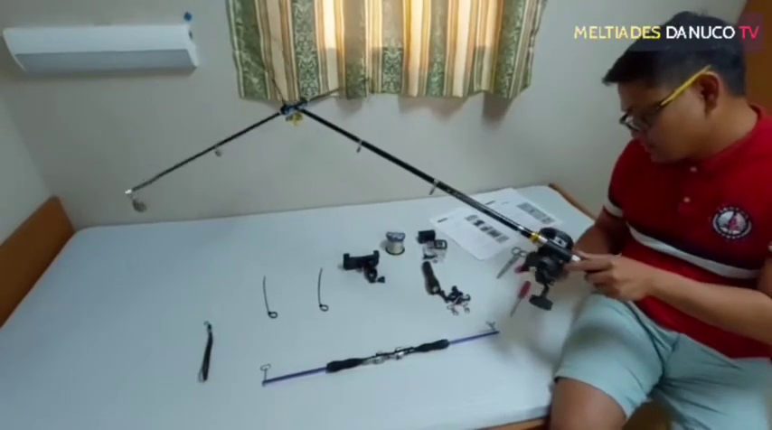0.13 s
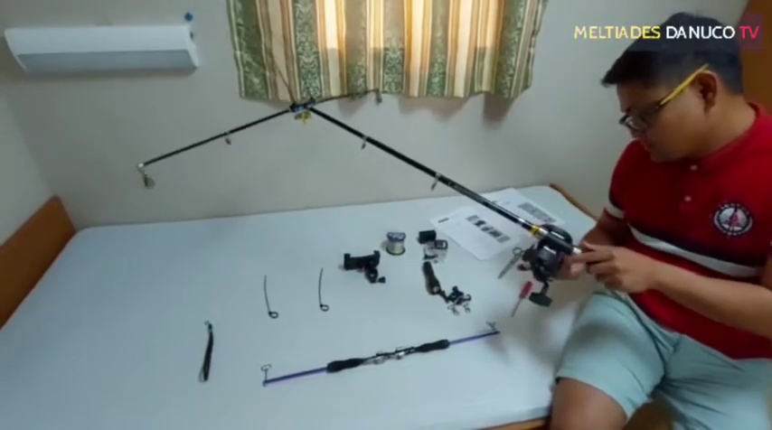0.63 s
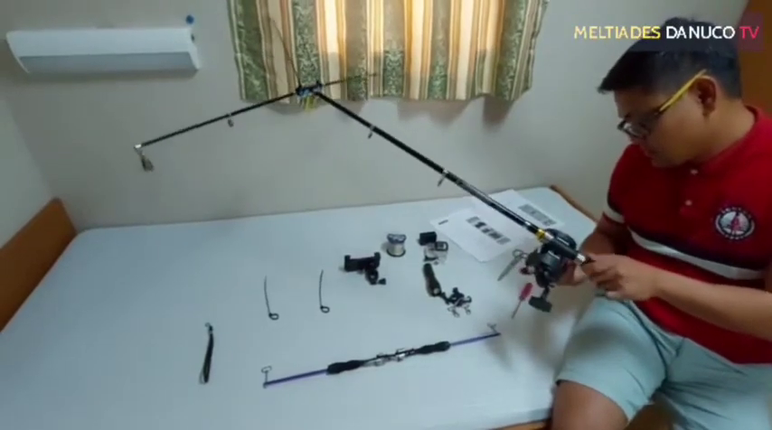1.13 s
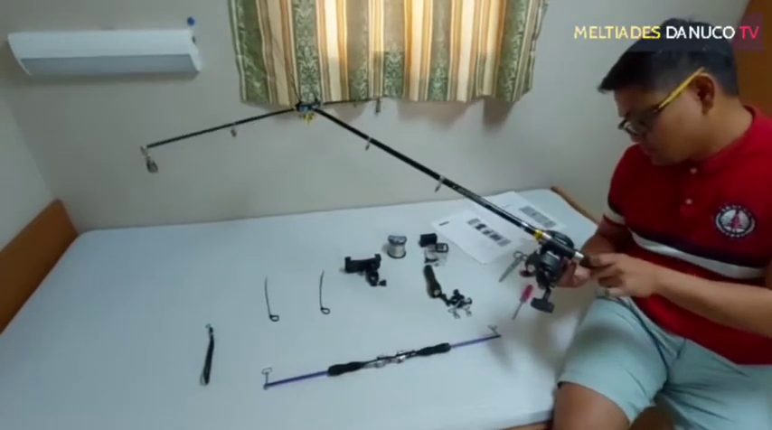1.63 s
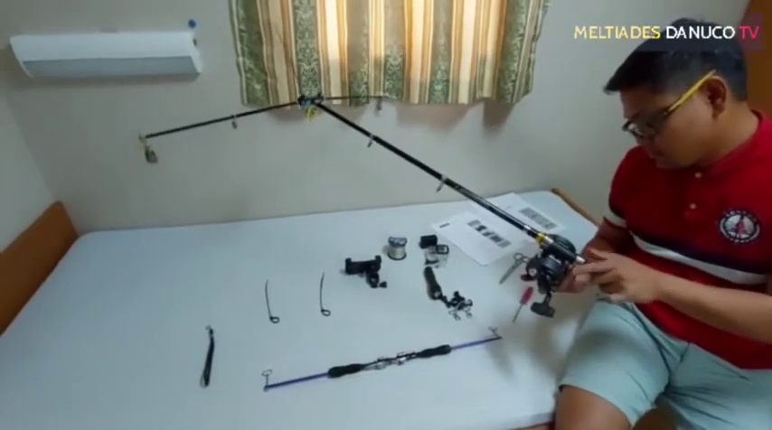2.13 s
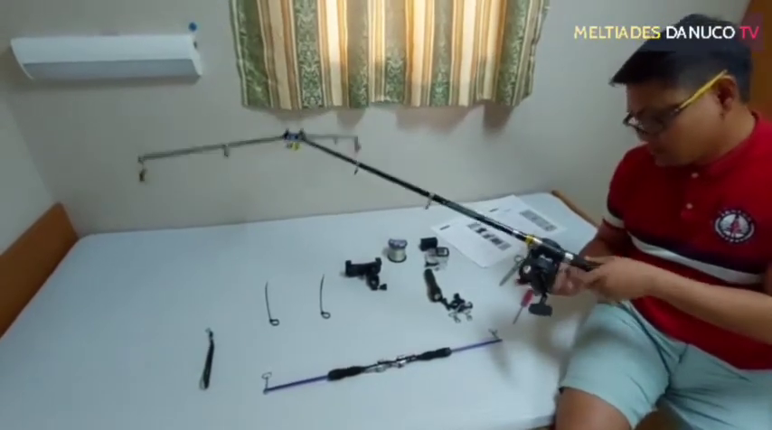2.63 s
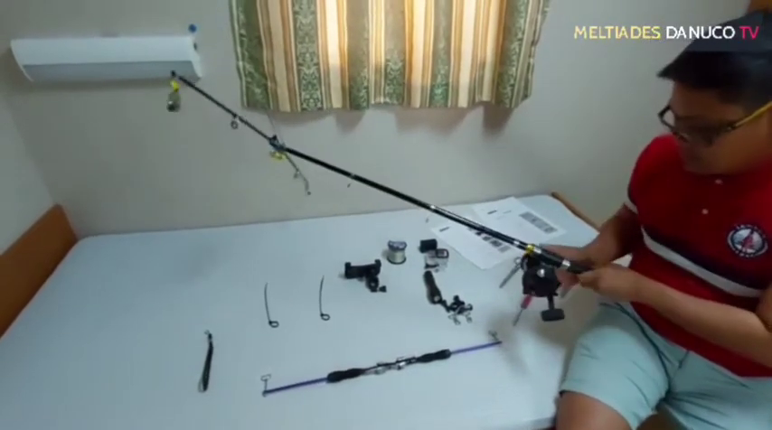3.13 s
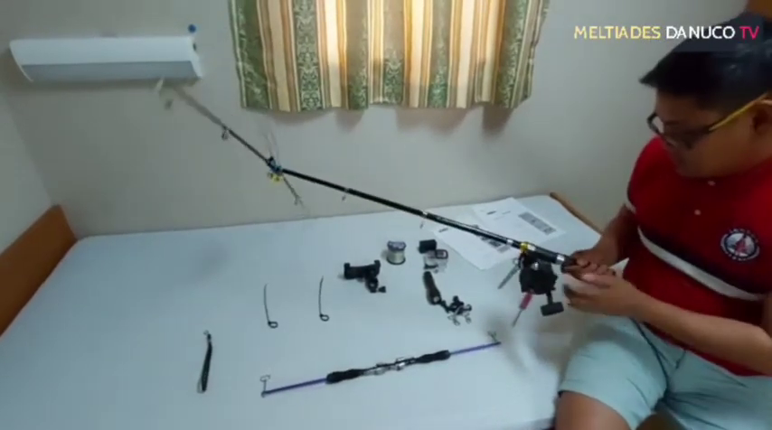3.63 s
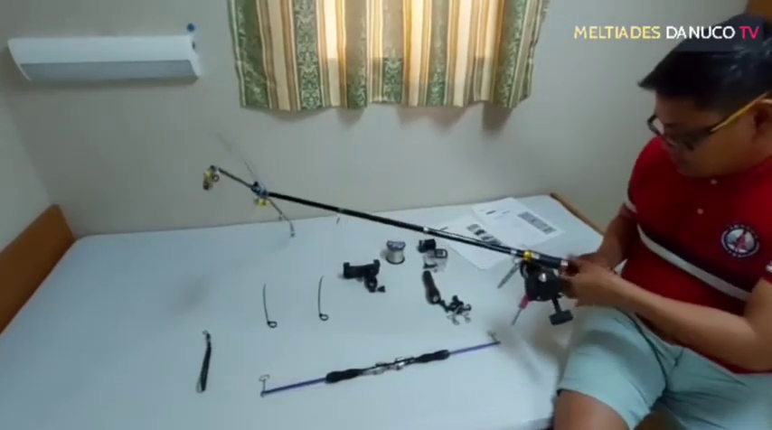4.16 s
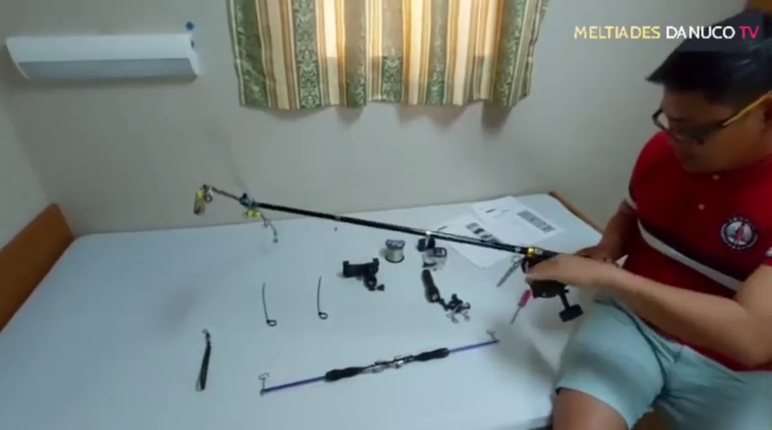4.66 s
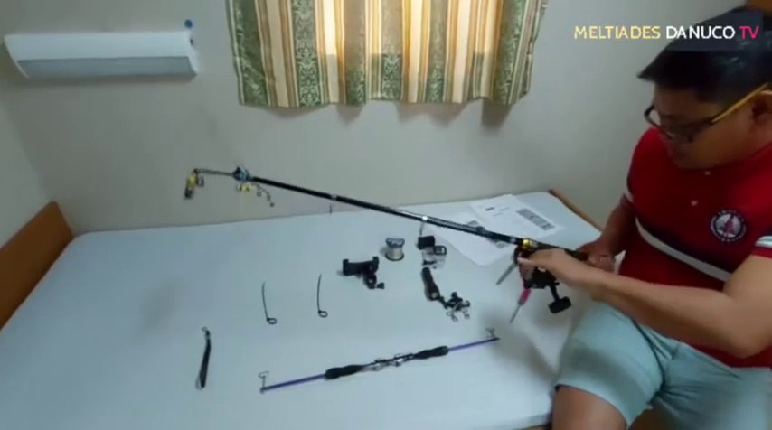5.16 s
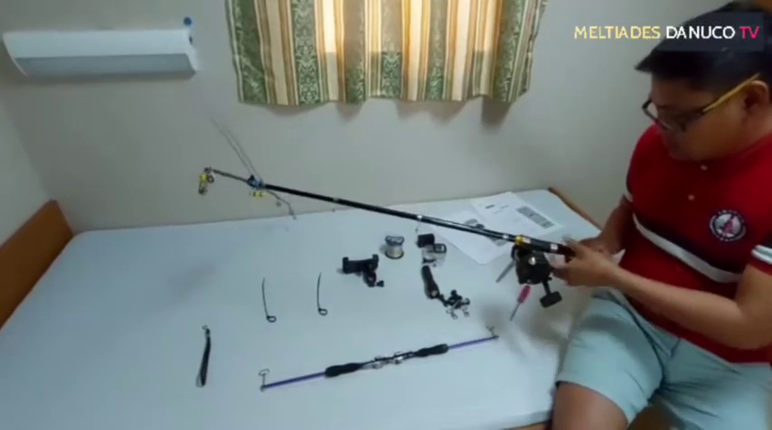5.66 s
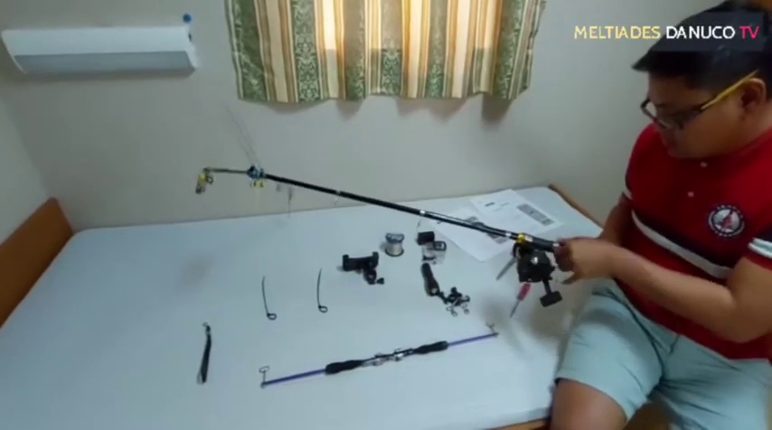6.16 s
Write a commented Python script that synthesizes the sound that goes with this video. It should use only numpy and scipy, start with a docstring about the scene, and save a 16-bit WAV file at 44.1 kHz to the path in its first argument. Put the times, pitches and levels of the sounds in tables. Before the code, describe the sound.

In a small hard-walled cabin, a deep, swelling engine rumble and throbbing drone run throughout beneath soft ventilation hiss and thin, wavering whines. Close by, a fishing rod and reel are handled: sparse plastic clicks, dull handle knocks and very high metal tinkles, busiest between one and a half and three seconds. A loud bail snap rings just before four seconds, then only scattered clicks follow. Close stereo microphones, dull at the very top.

```python
"""A fishing rod and reel are handled close by: plastic clicks and knocks, one loud snap of the bail, and small
metal tackle that tinkles near 11 kHz. Each hit is shaped noise, drawn out by the echoes of hard walls.
The small cabin around is filled by distant machinery, a swelling hull rumble with a wavering hum and a throbbing
drone, and by ventilation hiss with narrow whines. All are coloured noise but the hum, a sine.
Two microphones a few centimetres apart hear it."""
import sys
import numpy as np
from scipy import signal
from scipy.fft import rfft, irfft, next_fast_len
from scipy.io import wavfile
from scipy.ndimage import uniform_filter1d

SR = 44100
rng = np.random.default_rng(int(sys.argv[2]) if len(sys.argv) > 2 else 0)


def invert_db(level):
    """Linear amplitude ratio for a level in decibels (20 dB per decade), elementwise."""
    return 10 ** (np.asarray(level, dtype=float) / 20)


def int16_out(signal):
    """Quantize to a 16-bit WAV file."""
    q = np.round(np.clip(np.atleast_2d(signal).T, -1, 1) * 32767)
    wavfile.write(sys.argv[1], SR, q.astype(np.int16))


N = 277213
SIZE = next_fast_len(N)
HZ = np.arange(SIZE // 2 + 1) * SR / SIZE
TIME = np.arange(N) / SR


def unit(x):
    """Scale to rms 1."""
    return x / np.sqrt(np.mean(x ** 2))


def slope(points):
    """Gain per frequency, drawn through (Hz, dB) points on a logarithmic frequency axis."""
    hz, db = np.transpose(points)
    return invert_db(np.interp(np.log(HZ + 1), np.log(hz), db))


def bumps(modes):
    """Gain per frequency of steep resonances (Hz, width Hz, dB), each with its own total level."""
    power = 0
    for hz, width, db in modes:
        offset = (HZ - hz) / (width / 2)
        power = power + invert_db(db) ** 2 / width / (1 + offset ** 2) ** 2
    return np.sqrt(power)


def cabin_noise(gain, closer=0.):
    """Coloured noise at two microphones: a common part, late on the left, plus diffuse parts; rms 1."""
    lag_s = 11 / SR
    # How alike the microphones hear the cabin. Each row: frequency in Hz, share of the power common to both.
    alike = [(60, 0.98), (130, 0.95), (270, 0.89), (570, 0.78), (1000, 0.52), (4000, 0.046), (7000, 0.38),
             (11000, 0.29)]
    hz, share = np.transpose(alike)
    share = np.clip(np.interp(np.log(HZ + 1), np.log(hz), share) + closer, 0, 1)
    common, left, right = rng.standard_normal((3, len(HZ))) + 1j * rng.standard_normal((3, len(HZ)))
    together = np.array([common * np.exp(-2j * np.pi * HZ * lag_s), common])
    apart = np.array([left, right])
    pair = np.sqrt(share) * together + np.sqrt(1 - share) * apart
    return unit(irfft(pair * gain, SIZE)[:, :N])


def walk(rate):
    """Random levels held 1 / rate s and slewed twice; rms 1."""
    hold = int(SR / rate)
    steps = np.repeat(rng.standard_normal(N // hold + 1), hold)
    return unit(uniform_filter1d(uniform_filter1d(steps, hold), hold)[:N])


def evened(x, hold_s, share):
    """Machine noise is steadier than free noise: part of its own slow wander is divided out."""
    power = uniform_filter1d(np.mean(x ** 2, axis=0), int(hold_s * SR)) + 1e-9
    return unit(x * power ** (-share / 2))


def hull_rumble():
    """Deep rumble with a wavering hum, and an upper panel resonance, each swelling on its own."""
    # Swell of the hull; both levels dip briefly as the bail snaps.
    # Each row: start in seconds, deep rumble level in dB, upper rumble level in dB.
    swell = [(0.0, -28, -34.5), (0.5, -27.5, -32.5), (0.9, -27, -35.5), (1.45, -25.5, -33.5),
             (1.9, -27, -32.5), (2.25, -31, -36), (2.7, -27, -35.5), (3.1, -28, -34), (3.55, -26, -31),
             (3.84, -25.5, -36), (3.88, -37, -45), (3.93, -26.5, -30.5), (4.4, -24.5, -30),
             (4.9, -28.5, -30), (5.35, -24.5, -32), (5.75, -28, -35), (6.13, -27, -33), (6.29, -36, -43)]
    # Colour of the deep rumble. Each row: frequency in Hz, relative density in dB per Hz.
    rumble_colour = [(12, -39), (28, -9.5), (54, -2.5), (70, 1), (100, -4.5), (130, -66), (220, -120)]
    # Resonances of the upper rumble. Each row: frequency in Hz, width in Hz, relative level in dB.
    upper_modes = [(114, 22.5, 0), (136.3, 22, -6), (178.4, 19.4, -13.5)]
    s, *columns = np.transpose(swell)
    deep_db, upper_db = (np.interp(TIME, s, column) for column in columns)
    hum_hz = 59.2 * (1 + 0.01885 * walk(3.6))
    hum = np.sqrt(2) * np.sin(2 * np.pi * np.cumsum(hum_hz) / SR)
    hum_db = -5.5  # against the deep noise
    deep = evened(cabin_noise(slope(rumble_colour)) + invert_db(hum_db) * hum, 0.3, 0.49)
    upper = evened(cabin_noise(bumps(upper_modes)), 0.3, 0.82)
    return invert_db(deep_db + 1.3 * walk(9)) * deep + invert_db(upper_db + 1.54 * walk(9)) * upper


def panel_drone():
    """A panel resonance: narrow-band noise that throbs a few times a second."""
    # Resonances of the panel. Each row: frequency in Hz, width in Hz, relative level in dB.
    drone_modes = [(239.7, 19.6, 0.5), (257.6, 47, 0)]
    # Throb of the drone. Each row: time in seconds, level in dB.
    throb = [(0.07, -50), (0.33, -37), (0.56, -56.5), (0.72, -38.5), (0.99, -37), (1.12, -50), (1.42, -37),
             (1.8, -47), (1.97, -34), (2.15, -57), (2.42, -32.5), (2.51, -53.5), (2.61, -35), (2.9, -49),
             (3.25, -45.5), (3.39, -34.5), (3.53, -49.5), (3.86, -37), (4.0, -56.5), (4.2, -37),
             (4.35, -36), (4.53, -35.5), (4.69, -57), (4.85, -31.5), (4.91, -51), (4.97, -32.5),
             (5.17, -51), (5.3, -34), (5.46, -46), (5.57, -32.5), (5.67, -46.5), (6.29, -48)]
    drone = evened(cabin_noise(bumps(drone_modes)), 0.32, 0.96)
    return invert_db(np.interp(TIME, *np.transpose(throb)) + 1.2 * walk(6.5)) * drone


def air_hiss():
    """Broad air noise in overlapping octave bands, each flickering slightly under a shared slow swell."""
    # Colour of the hiss. Each row: frequency in Hz, relative density in dB per Hz.
    air_colour = [(88, -13), (150, -3), (244, -10), (292, -11.5), (338, -9), (435, -10.5), (761, -16),
                  (1380, -23), (2690, -24.5), (3000, -23), (3530, -28.5), (5740, -28.5), (6520, -36),
                  (10400, -34.5), (11200, -61), (14600, -70), (22000, -120)]
    hiss_db = -37
    swell, hiss = walk(1.91), 0
    air = rfft(cabin_noise(slope(air_colour)), SIZE)
    for octave in range(7, 15):  # centred on 2 ** octave Hz
        band = np.cos(np.pi / 2 * np.clip(np.log2(HZ + 1) - octave, -1, 1)) ** 2
        level = invert_db(hiss_db + 0.2 * swell + 0.72 * walk(11))
        hiss = hiss + level * irfft(air * band, SIZE)[:, :N]
    return hiss


def whines():
    """Whines riding on the hiss: bands of noise, mostly narrow, that waver in two families."""
    # Pitch of each whine, in Hz.
    whine_hz = [2934, 2980, 3074, 3327, 3050, 3760, 5330, 5745, 5850, 7400, 10150, 10750]
    # Shape of each whine, in the same order. Each row: width in Hz, level in dB.
    whine_shapes = [(41, -52), (27, -59), (51, -59.5), (35, -59), (650, -53), (120, -62), (380, -54),
                    (70, -59), (79.6, -56), (190, -64.5), (120, -61), (320, -61.5)]
    modes = [(hz, *shape) for hz, shape in zip(whine_hz, whine_shapes)]
    out = 0
    for family in (modes[0::2], modes[1::2]):
        family_db = 10 * np.log10(sum(invert_db(db) ** 2 for _, _, db in family))
        waver = invert_db(family_db + 1.0 * walk(12) + 0.8 * walk(2))
        # each whine comes from one spot, so the microphones hear it more alike
        out = out + waver * cabin_noise(bumps(family), 0.12)
    return out


def struck(gain, hits, rise_s, pan_db):
    """Hits (s, dB, t60 s) drawn out by dense wall echoes that decay and stop short; the side varies a little."""
    echo_end_s, echo_fade_s, pan_scatter_db = 0.069, 0.003, 1.1
    power, age = np.zeros((2, N + SR)), np.arange(SR // 8) / SR
    end = 1 / (1 + np.exp((age - echo_end_s) / echo_fade_s))
    direct = 1 + 0.34 * np.exp(-age / 0.005)  # the direct sound arrives ahead of the echoes
    onset = (1 - np.exp(-age / rise_s)) * direct * end
    noise = cabin_noise(gain, -0.19)
    pans_db = pan_db + pan_scatter_db * rng.standard_normal(len(hits))  # left minus right
    for (s, db, t60), side_db in zip(hits, pans_db):
        sides = invert_db(db + np.array([[side_db], [-side_db]]) / 2)
        decay = np.exp(-np.log(1000) * age / t60)
        start = int(s * SR)
        power[:, start:start + len(age)] += (sides * onset * decay) ** 2
    return np.sqrt(power[:, :N]) * noise


def two_toned(first, second, hits, rise_s, pan_db):
    """Sharp hits (s, first dB, second dB, t60 s) that ring in two colours, each at its own level."""
    first_hits = [(s, db, t60) for s, db, _, t60 in hits]
    second_hits = [(s, db, t60) for s, _, db, t60 in hits]
    return struck(first, first_hits, rise_s, pan_db) + struck(second, second_hits, rise_s, pan_db)


def lasting(rows, t60_s):
    """Give every hit the same decay time."""
    return [(*row, t60_s) for row in rows]


def faint(db):
    """Six barely heard contacts (s, dB) at random moments, up to 3 dB either side of the given level."""
    when, size = rng.random((6, 2)).T
    return list(zip(when * N / SR, db + 3 * (2 * size - 1)))


def tackle_tinkles():
    """Small metal tackle rings in a few high resonances."""
    # Resonances of the metal. Each row: frequency in Hz, width in Hz, relative level in dB.
    tackle_modes = [(10730, 370, 2.5), (10730, 530, 6), (9870, 270, -5.5), (6800, 300, -12)]
    # Tinkles of the tackle. Each row: start in seconds, level in dB.
    tinkle_hits = [(0.5754, -47), (0.605, -38.5), (1.0124, -43), (1.486, -40), (1.5025, -38.5),
                   (1.7004, -32.5), (1.725, -36.5), (2.3804, -41), (2.6768, -34.5), (2.7194, -42),
                   (2.9981, -50.5), (3.3223, -45.5), (3.5778, -43), (3.6094, -44.5), (3.8442, -40),
                   (3.8554, -33.5), (4.0444, -46), (4.5126, -47), (4.579, -42), (4.6768, -46),
                   (5.1123, -41), (5.3294, -48), (6.1624, -49), (6.1794, -41), (6.2244, -35), (6.2407, -33)]
    hits = lasting(tinkle_hits + faint(-52), 0.16)
    return struck(bumps(tackle_modes), hits, rise_s=0.003, pan_db=2.7)


def handle_knocks():
    """The rod handle knocks: two bands of noise, each knock with its own decay time."""
    # Knocks of the handle. Each row: start in seconds, 1-3.5 kHz level in dB, 0.4-1 kHz level in dB,
    # decay time t60 in seconds.
    knock_hits = [(0.5926, -43, -37, .3), (1.4845, -41.5, -38, .18), (1.5014, -44, -37.5, 0.28),
                  (1.7033, -38.5, -31, 0.19), (1.7154, -38, -33, 0.18), (1.7494, -49, -39, 0.092),
                  (1.8404, -47, -38, .2), (2.295, -48, -40, .18), (2.379, -31, -32.5, 0.11),
                  (2.552, -43.5, -45, .18), (2.602, -43, -42, .3), (2.6394, -42, -43, .3),
                  (2.6764, -40.5, -42, 0.32), (3.5848, -47, -42, .16), (4.6764, -40.5, -44, .25)]
    # Colours of the upper and the lower knock. Each row: frequency in Hz, relative density in dB per Hz.
    knock_high = [(700, -18), (1100, 1), (2200, 2.5), (3300, 2.5), (4500, -17.5)]
    knock_low = [(250, 1.5), (450, 0), (700, 2.5), (1100, -5.5), (1600, -24.5)]
    return two_toned(slope(knock_high), slope(knock_low), knock_hits, rise_s=0.0013, pan_db=0)


def reel_clicks():
    """Plastic reel parts snap: two bright bands of noise, among them faint clicks at random moments."""
    # Clicks of the reel. Each row: start in seconds, 3.5-6 kHz level in dB, 6-10 kHz level in dB.
    click_hits = [(0.7714, -46, -41.5), (1.0016, -43, -44), (1.1894, -43.5, -51.5), (1.4144, -42.5, -44),
                  (1.6154, -44, -50), (1.7034, -52, -47), (1.839, -36, -40), (1.8574, -42, -43),
                  (2.0454, -44.5, -50), (2.2936, -35, -39), (2.5526, -36.5, -41.5), (2.6764, -46, -41),
                  (2.7277, -45, -40.5), (2.7494, -44, -42), (3.3194, -54, -45), (3.7694, -44, -44),
                  (4.6773, -46, -39), (4.6944, -45, -46), (5.0984, -45, -37.5), (5.1094, -34.5, -40.5),
                  (6.1604, -41.5, -51)]
    # Colours of the lower and the upper click. Each row: frequency in Hz, relative density in dB per Hz.
    click_low = [(2800, -13), (3800, -0.5), (4900, 2), (6000, -3.5), (7500, -15.5)]
    click_high = [(4800, -38), (6200, 0.5), (8000, -1.5), (10500, 3), (11500, -6.5)]
    small = [(s, db, db) for s, db in faint(-51)]
    hits = lasting(click_hits + small, 0.16)
    return two_toned(slope(click_low), slope(click_high), hits, rise_s=0.002, pan_db=-3)


def bail_snap():
    """The metal bail arm snaps shut and bounces: a broad clack with ringing resonances."""
    # Snap and bounce of the bail. Each row: start in seconds, broad clack level in dB, ringing level in dB.
    bail_hits = [(3.843, -23.5, -27), (3.855, -27.5, -32)]
    # Colour of the clack. Each row: frequency in Hz, relative density in dB per Hz.
    clack_colour = [(290, -37), (500, -13), (985, -12), (2210, -3), (2550, -5), (3360, -5), (3880, -6),
                    (6530, -6), (10600, -7), (11300, -23), (14700, -42), (22000, -120)]
    # Resonances of the metal arm. Each row: frequency in Hz, width in Hz, relative level in dB.
    ring_modes = [(2267, 62, 3.5), (2810, 160, -13), (3250, 39, -2), (3490, 56, -1), (4580, 45, 2.5),
                  (5450, 160, 3), (5750, 46, -7), (6340, 27, -11), (6410, 23, -5), (6650, 29, -1),
                  (6800, 34, -3), (7390, 29, -16), (7930, 79, -7), (7970, 21, 2), (9120, 45, -17),
                  (9530, 31, -8)]
    hits = lasting(bail_hits, 0.21)
    return two_toned(slope(clack_colour), bumps(ring_modes), hits, rise_s=0.0021, pan_db=0.5)


def handling():
    """Rod and reel in the hands; a fast random flicker roughens every hit and its tail."""
    flicker = invert_db(1.1 * walk(500))
    return flicker * (tackle_tinkles() + handle_knocks() + reel_clicks() + bail_snap())


def scene():
    """Machinery, air and handling together."""
    machinery = hull_rumble() + panel_drone()
    ventilation = air_hiss() + whines()
    return machinery + ventilation + handling()


def band_limit(x):
    """A steep low-pass at the top of the band."""
    return signal.sosfilt(signal.butter(12, 11850, fs=SR, output="sos"), x)


def record(dry):
    """The recorder cuts the top steeply, above 11125 Hz."""
    steep = signal.ellip(12, 0.2, 85, 11125, fs=SR, output="sos")
    cut = signal.sosfilt(steep, dry)
    return band_limit(cut)


dry = scene()
out = record(dry)
int16_out(out)
```